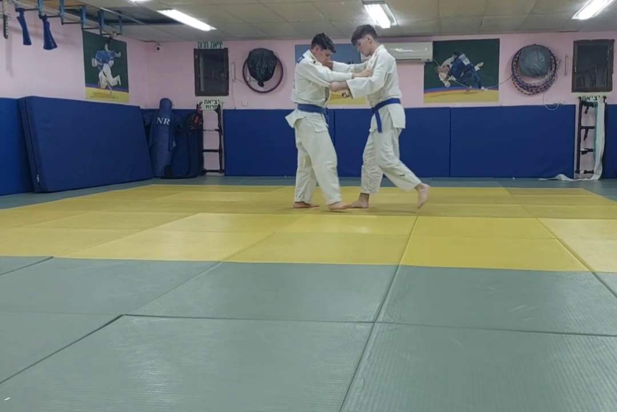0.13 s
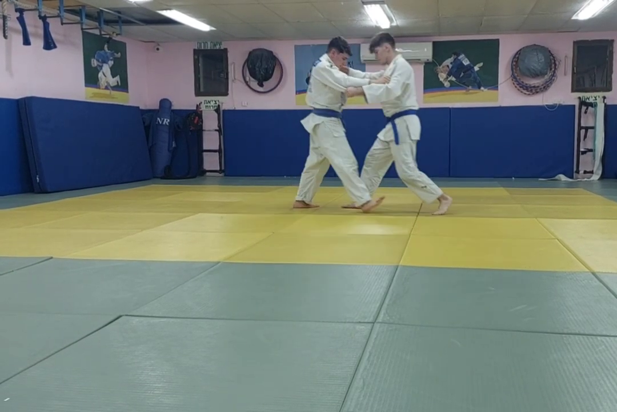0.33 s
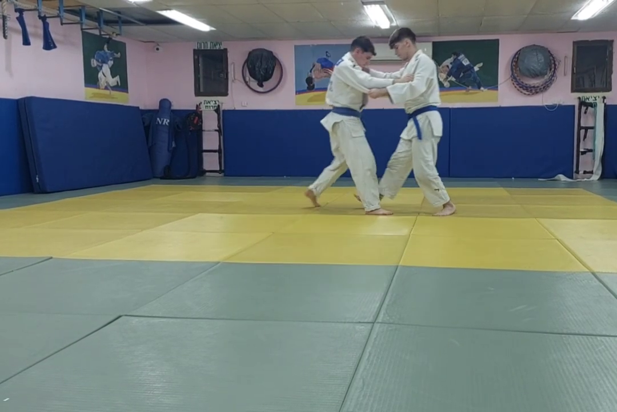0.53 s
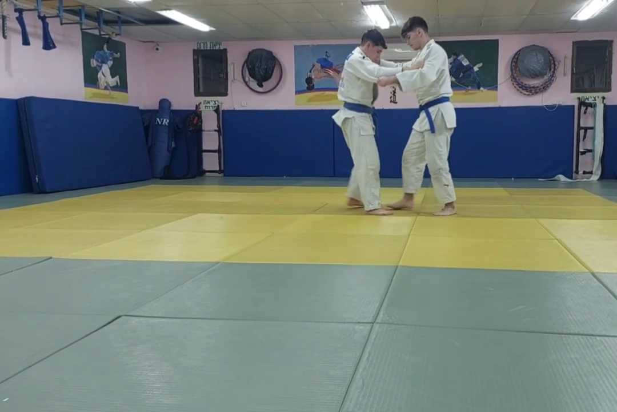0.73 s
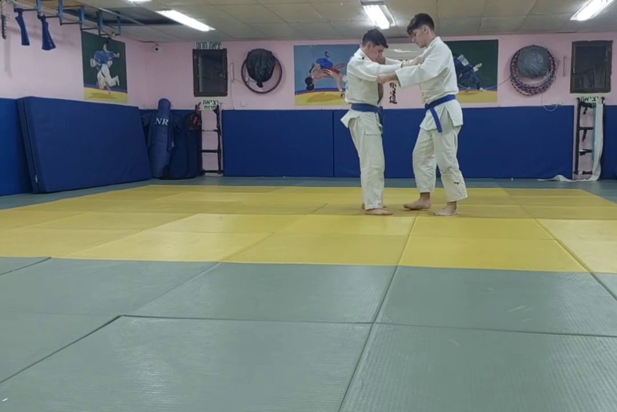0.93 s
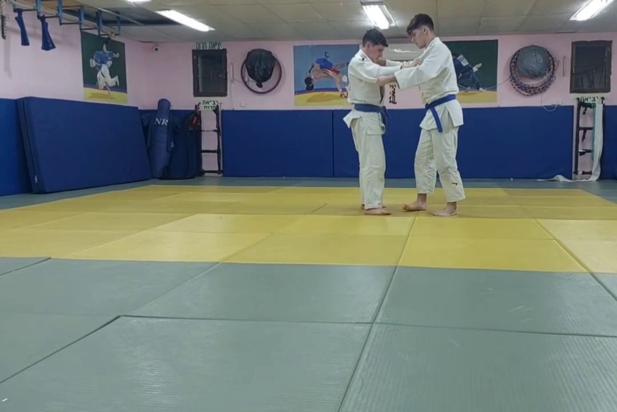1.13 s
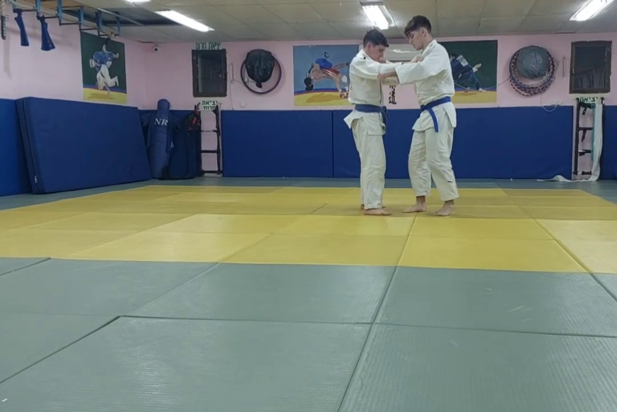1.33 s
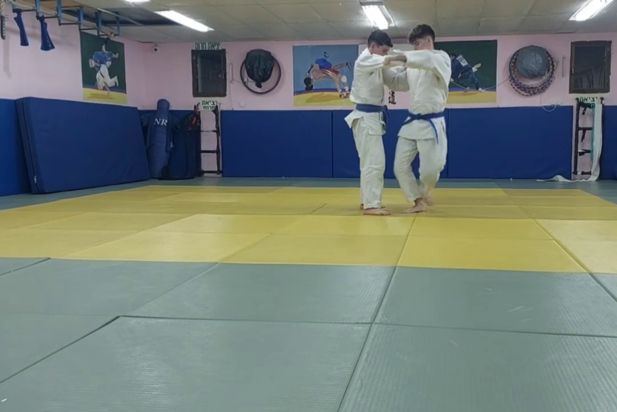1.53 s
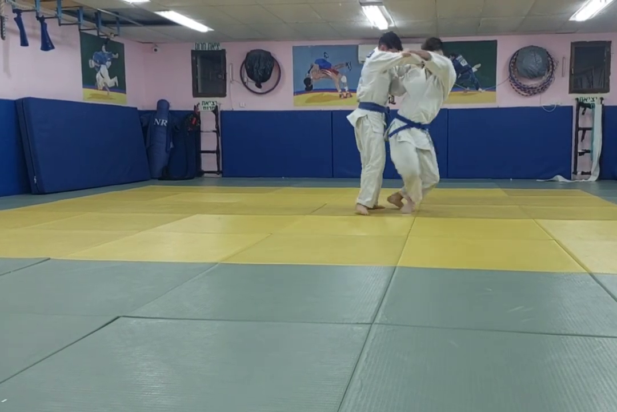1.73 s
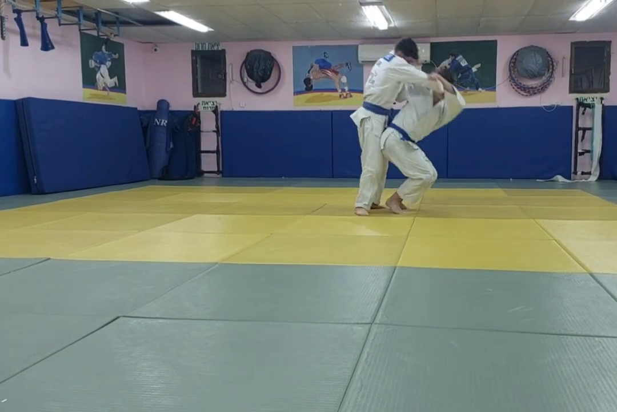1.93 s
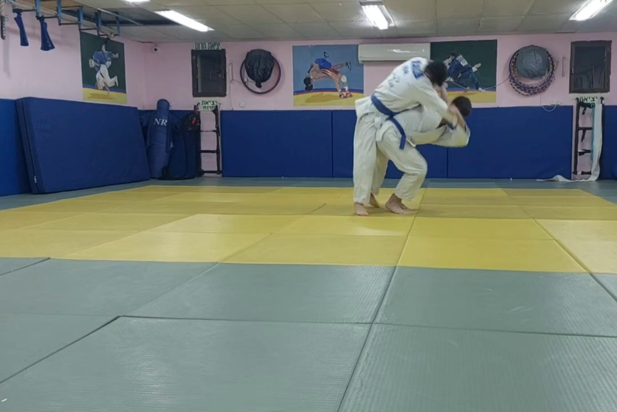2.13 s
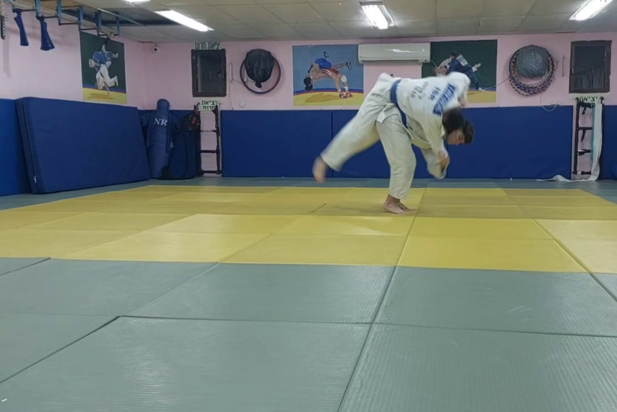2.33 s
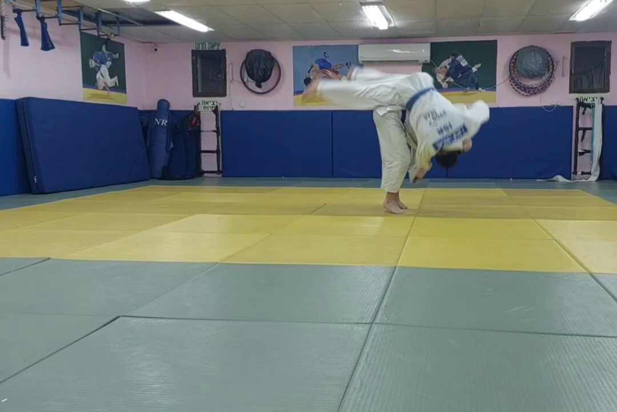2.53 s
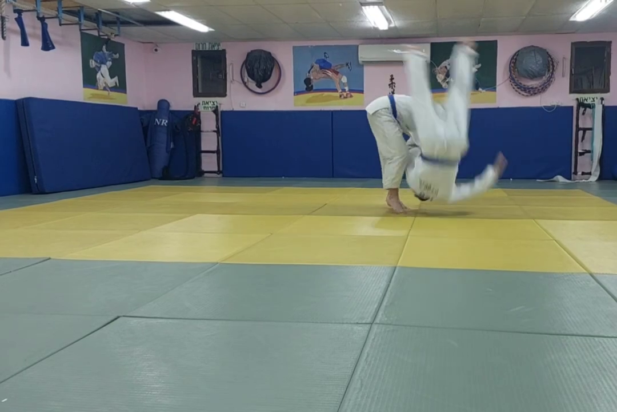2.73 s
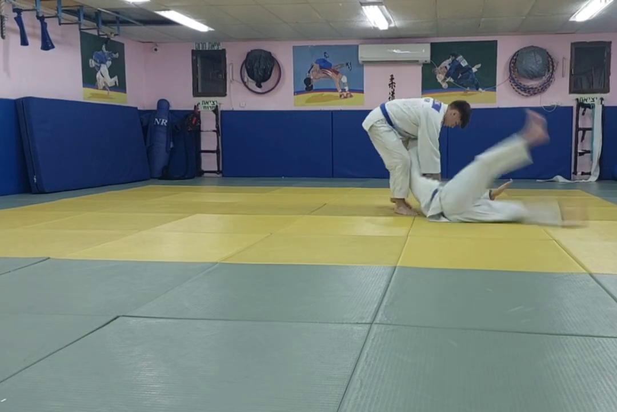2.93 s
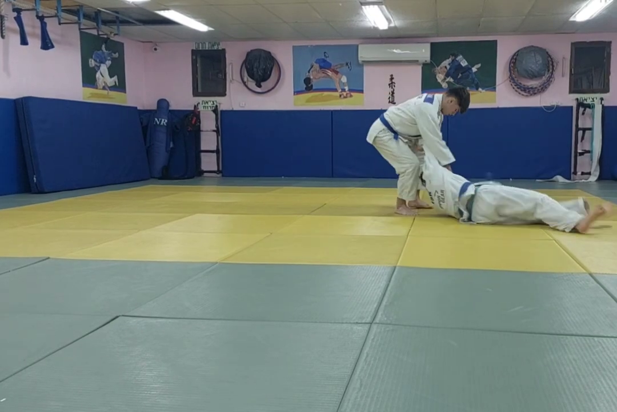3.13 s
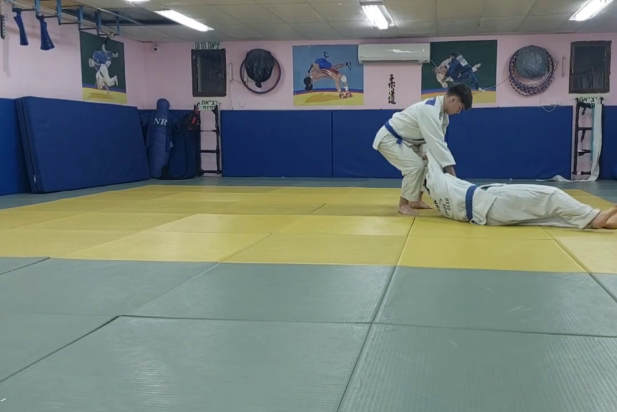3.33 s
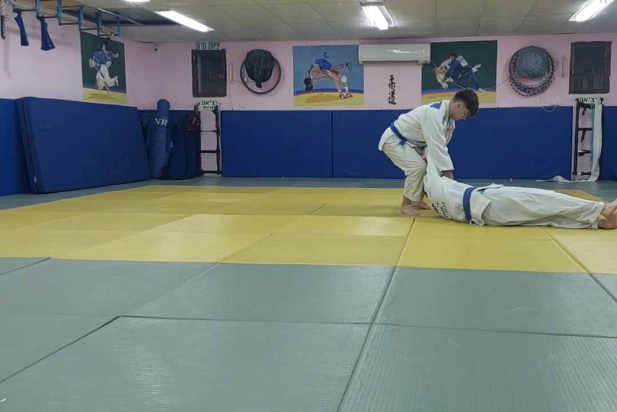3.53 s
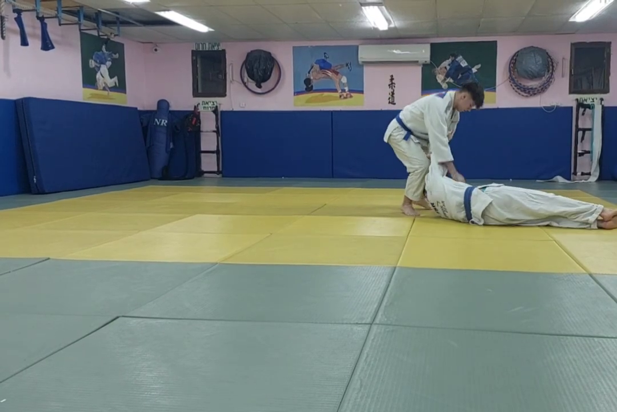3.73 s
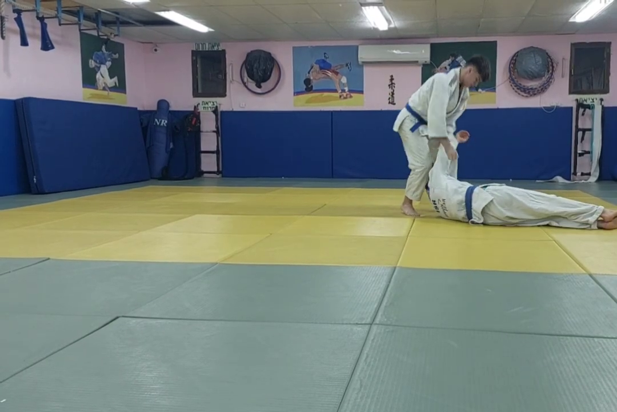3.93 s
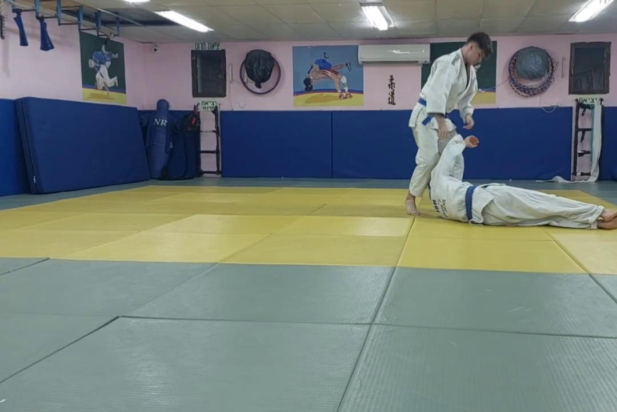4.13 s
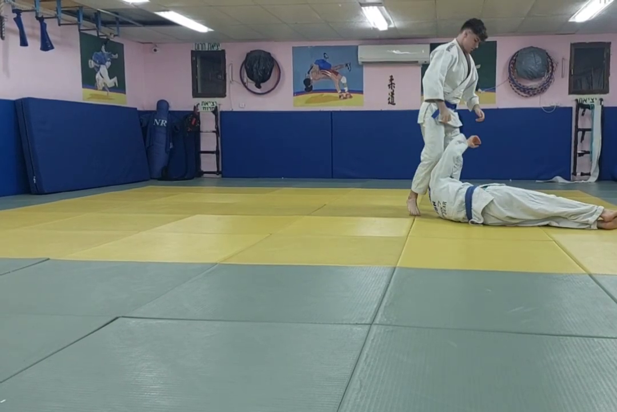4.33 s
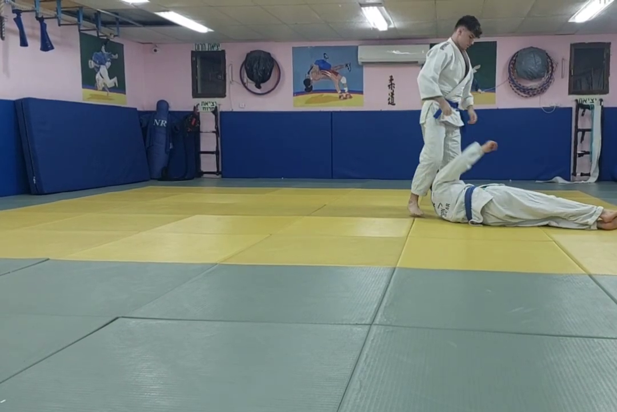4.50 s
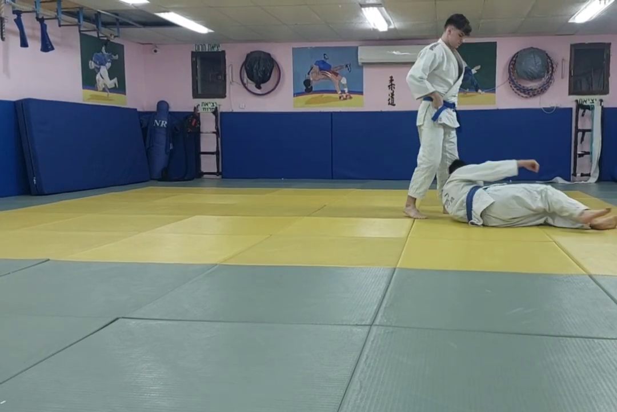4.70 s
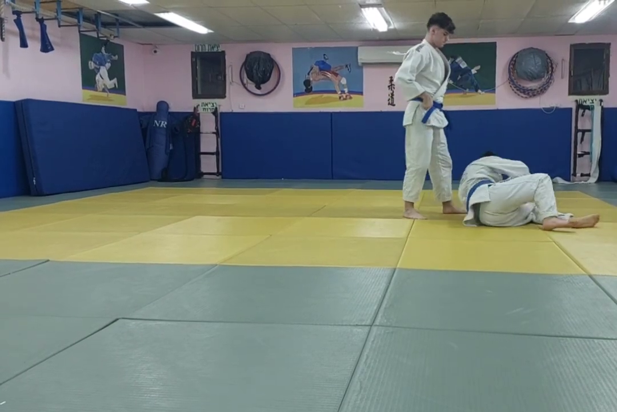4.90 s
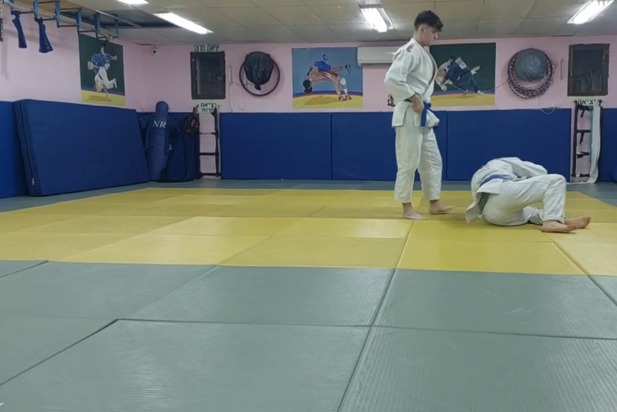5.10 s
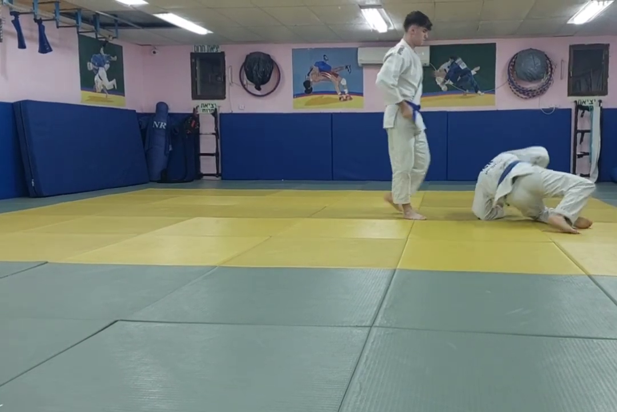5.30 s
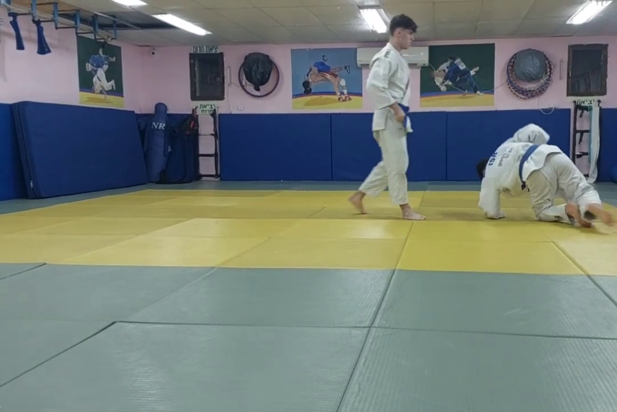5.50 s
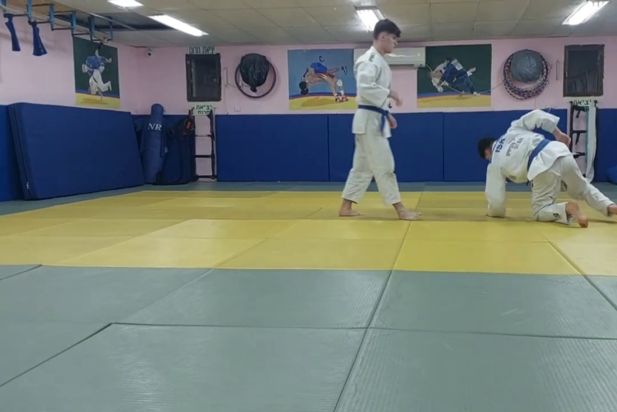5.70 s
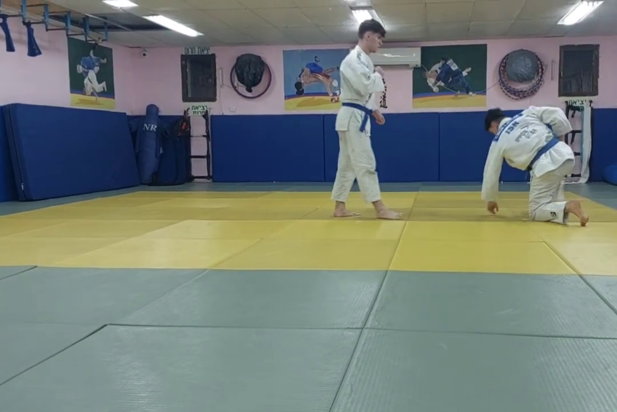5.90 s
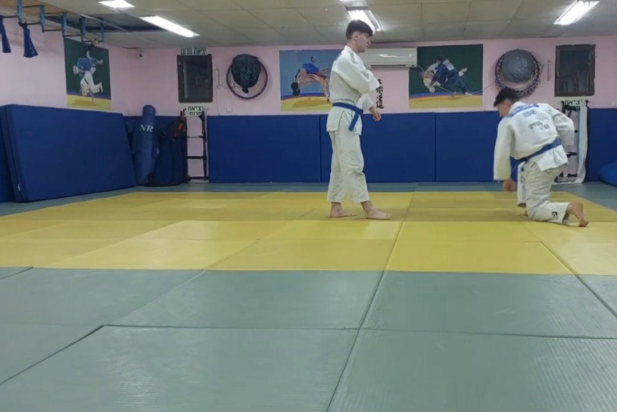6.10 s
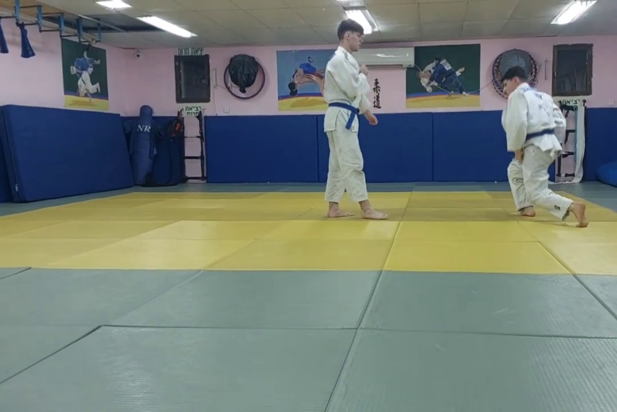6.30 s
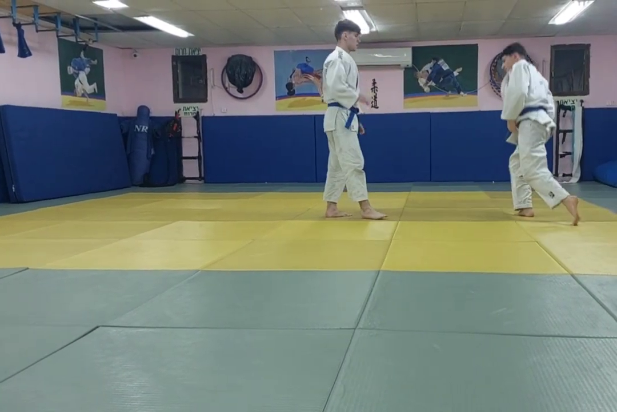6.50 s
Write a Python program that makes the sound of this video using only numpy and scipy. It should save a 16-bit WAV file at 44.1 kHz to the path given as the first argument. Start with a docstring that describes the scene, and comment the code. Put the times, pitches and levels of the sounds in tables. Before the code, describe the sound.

Soft bare steps and thick jacket fabric rub over a steady low air rush. A body then hits the mats in a quick ragged cluster, arm slap first, then a heavier second blow, ringing the floor with a low boom that soon fades. Afterwards come light rustles, brief squeaks and dull steps as the fighters separate and rise. Distant stereo pickup in a moderately live room, its level ducking after the loud fall.

```python
"""Fall on padded mats

A thrown body lands on mats in a low training hall: arm, back, hips, legs and heels, one after the other.
Force bumps ring floor resonances; slaps are noise bursts with reverberant echoes. Cloth and feet rub as
patchy noise; short squeaks, ticks and a noisy swish are wavering tones; ventilation is low noise.
Loud sound turns the gain down."""
import sys
import numpy as np
from scipy import signal
from scipy.fft import rfft, irfft, next_fast_len
from scipy.io import wavfile
from scipy.ndimage import uniform_filter1d, minimum_filter1d, map_coordinates

SR = 44100
rng = np.random.default_rng(int(sys.argv[2]) if len(sys.argv) > 2 else 0)


def file_out(sig):
    """Save sig as 16-bit WAV at sys.argv[1]."""
    # one column per channel
    cols = np.atleast_2d(sig).T
    # limit, then scale
    lim = np.clip(cols, -1, 1)
    pcm = np.round(lim * 32767).astype(np.int16)
    wavfile.write(sys.argv[1], SR, pcm)


N = 288855
T = np.arange(N) / SR

# Contacts of the fall. Each row: start in seconds, relative slap level in dB, slap length in seconds,
# slap treble edge in Hz, echo over slap in dB, relative push level in dB, push length in seconds.
CONTACTS = [(2.8179, -31, 0.0072, 3500, 2, -44, 0.0028), (2.8228, -20, 0.019, 3960, 2.5, -17.5, 0.0011),
            (2.8372, -10, 0.0032, 13800, 4, -5.5, 0.0027), (2.84, -9.5, 0.0063, 14000, 3, -1, 0.0027),
            (2.847, -15.5, 0.0031, 7100, 5.5, -5, 0.0027), (2.862, -32, 0.0052, 6000, 0.5, -16.5, 0.0033),
            (2.878, -17, 0.0045, 6000, 4, -8.5, 0.0049), (2.9294, -10, 0.0021, 3500, -6, -25, 0.0028),
            (2.977, -5.5, 0.0083, 4400, 0, -43, .003), (2.9805, -12.5, 0.0018, 14800, 4, 0, 0.0035),
            (2.991, -5, 0.0027, 3500, -10.5, -4, 0.0024), (3.005, -29.5, .006, 5000, -7.5, -13.5, 0.0043),
            (3.02, -18.5, 0.021, 5000, -5.5, -16.5, 0.0065), (3.07, -30, .008, 5000, -9, -28.5, 0.0095),
            (3.2, -37, 0.023, 9350, 2.5, -16, 0.0047), (3.219, -42, 0.025, 6050, 7.5, -19.5, 0.0054)]


def amp(db):
    """Gain of a level in dB."""
    return 10 ** (np.asarray(db) / 20)


def unit(x):
    """Scaled to rms 1."""
    return x / np.sqrt(np.mean(x ** 2) + 1e-20)


def along(points, hz):
    """(Hz, value) points interpolated on a log frequency axis."""
    point_hz, value = np.transpose(points)
    return np.interp(np.log(hz + 1), np.log(point_hz + 1), value)


def wobble(rate_hz, size=N):
    """A smooth random curve through rate_hz normal knots a second."""
    knots = rng.standard_normal(int(size * rate_hz / SR) + 4)
    return map_coordinates(knots, [T[:size] * rate_hz])


def filtered(x, response):
    """x times a response of frequency, zero-padded."""
    m = next_fast_len(x.shape[-1] + 8192)
    spectrum = rfft(x, m) * response(np.fft.rfftfreq(m, 1 / SR))
    return irfft(spectrum, m)[..., :x.shape[-1]]


def diffuse(pair, colour):
    """Two unrelated signals coloured and mixed so that bass is shared and treble differs."""
    # Left-right likeness. Each row: frequency in Hz, correlation from -1 to 1.
    likeness = [(60, 0.9), (180, 1), (550, 0.72), (1650, 0.052), (4970, -0.12), (15000, 0.23)]

    def mid_side(hz):
        turn = np.arccos(np.clip(along(likeness, hz), -1, 1)) / 2
        return amp(along(colour, hz)) * [np.cos(turn), np.sin(turn)]

    mid, side = filtered(pair, mid_side)
    return np.array([mid + side, mid - side])


def rush(colour, patchy_db):
    """Stereo noise of rms 1 with time-frequency patches of random gain."""
    z = signal.stft(rng.standard_normal((2, N)), nperseg=512)[2]
    field = uniform_filter1d(rng.standard_normal(z.shape[1:]), size=6, axis=0)
    field = uniform_filter1d(field, size=12, axis=1)
    patchy = signal.istft(z * amp(patchy_db * unit(field)), nperseg=512)[1][:, :N]
    return unit(diffuse(patchy, colour))


def tail(colour, size=SR * 3 // 4):
    """A fresh reverberant tail, mean channel energy 1: each frequency dies at its own speed."""
    # Hall decay. Each row: frequency in Hz, t60 in seconds.
    hall_t60 = [(100, 1), (300, 0.22), (700, 0.3), (2000, 0.4), (6000, 0.56), (14000, 0.42)]
    hz, t, z = signal.stft(diffuse(rng.standard_normal((2, size)), colour), SR, nperseg=256)
    dying = z * amp(-60 * t / along(hall_t60, hz)[:, None])
    decay = signal.istft(dying, SR, nperseg=256)[1][:, :size]
    return decay / np.linalg.norm(decay) * np.sqrt(2)


def hall(x):
    """Mono x convolved with a stereo reverberant tail of nearly flat colour."""
    return signal.fftconvolve(x[None], tail([(20, 0.01), (20000, 0.0019)]), axes=1)[:, :N]


def pushes(rows):
    """The force on the floor: one smooth bump for each contact, its area set by the level."""
    force = np.zeros(N)
    for start_s, db, length_s in rows:
        bump = np.sin(np.pi * np.clip((T - start_s) / length_s, 0, 1)) ** 2
        force += amp(db) / (length_s * SR) * bump
    return force


def ringing(force, sustain):
    """Damped sine resonances answering a force, their decay times scaled by sustain."""
    # Floor and hall resonances. Each row: frequency in Hz, relative level in dB,
    # t60 in seconds at sustain 1, signed size of the first swing.
    resonances = [(30.6, -24, 4.3, 0.39), (36.96, -22.5, 2.5, -0.9), (41.1, -41, 1.2, 1),
                  (46.84, -24, 1.9, -0.95), (56.85, -14.5, 1.08, 1), (64.8, -2.5, 1.13, -0.82),
                  (69.1, -12.5, 0.71, 1), (76.25, -16.5, 0.82, -0.89), (93.2, -3.5, 0.29, 0.73),
                  (124.4, -9.5, 0.59, 0.7), (137.2, -9.5, 0.49, 1), (173.1, -3.5, 0.35, -0.81),
                  (216.2, -12, 0.24, 0.66), (261.6, -1.5, 0.075, 1), (304, -6, 0.056, 0.98),
                  (472, -10.5, 0.1, -1.1), (573, -0.5, 0.077, 1), (650, -16, .07, -1.3),
                  (950, -9, 0.056, 1)]
    t = T[:2 * SR]
    ring = np.zeros(len(t))
    for hz, db, t60_s, swing in resonances:
        ring += swing * amp(db - 60 * t / (t60_s * sustain)) * np.sin(2 * np.pi * hz * t)
    return signal.fftconvolve(force, ring)[:N]


def ventilation():
    """Ventilation air: a steady low noise rush that swells a little."""
    # Each row: frequency in Hz, relative level in dB per Hz.
    air_colour = [(12, -58), (20, -22.5), (53, -5), (198, -0.5), (301, -5), (607, -23), (825, -19),
                  (1120, -24.5), (1660, -21), (2260, -29), (3250, -27), (4940, -38.5), (7310, -58),
                  (12800, -52.5), (16000, -54)]
    swell_db = 0.5 * wobble(3) + 1.17 * wobble(10)
    return amp(-45 + swell_db) * rush(air_colour, patchy_db=0.7)


def rubbing():
    """Friction noise: heavy cotton rustles; soles dragging over the vinyl add a fine fizz on top."""
    # Slides of cloth and feet. Each row: start in seconds, hold after the rise in seconds,
    # rustle level in dB, fizz relative to the rustle in dB.
    slides = [(.4, 0.058, -58.5, -22), (0.495, 0.29, -53.5, -16.5), (1.08, 0.042, -75, -3),
              (1.53, 0.06, -58, -26), (1.66, .05, -57, -15), (1.862, .04, -61, -15),
              (2.158, .03, -57.5, -16.5), (2.216, 0.018, -55, -16), (2.33, .06, -59, -21.5),
              (2.46, 0.046, -57, -22.5), (2.775, 0.51, -53, -22), (3.701, 0.12, -53, -18),
              (3.96, .15, -53, -27), (4.394, 0.29, -57, -21.5), (4.804, 0.23, -57.5, -16),
              (5.104, 0.18, -56.5, -20.5), (5.352, 0.086, -54.5, -19), (5.75, 0.027, -56.5, -17.5),
              (5.837, 0.11, -53.5, -17.5), (6.073, 0.084, -58, -24), (6.4, 0.22, -59.5, -29)]
    # Colours. Each row: frequency in Hz, relative level in dB per Hz.
    rustle_colour = [(200, -45), (400, -2.5), (800, 0), (1150, -4), (1550, -1), (2250, -8), (3000, 1.5),
                     (3700, -8), (4900, -9.5), (7000, -27.5), (9000, -65)]
    fizz_colour = [(5000, -58), (7500, -9), (10500, 0), (13000, 0), (16000, 0)]
    rest_db, rest_fizz_db = -63, -24  # the cloth never lies quite still; fizz is relative
    fade_s = 0.88  # time to fall 60 dB

    rustle_power = amp(2 * rest_db)
    fizz_power = amp(2 * (rest_db + rest_fizz_db))
    for start_s, hold_s, db, fizz_db in slides:
        rise_s = 0.042 + 0.24 * hold_s  # longer slides start more slowly
        rise = np.sin(np.pi / 2 * np.clip((T - start_s) / rise_s, 0, 1)) ** 2
        fading_s = np.maximum(T - start_s - rise_s - hold_s, 0)
        power = (rise * amp(db - 60 * fading_s / fade_s)) ** 2
        rustle_power = rustle_power + power
        fizz_power = fizz_power + amp(2 * fizz_db) * power
    fizz = np.sqrt(fizz_power) * rush(fizz_colour, patchy_db=1.0)
    rustle = np.sqrt(rustle_power) * rush(rustle_colour, patchy_db=2)
    uneven_db = 1 * wobble(25)
    return amp(uneven_db) * (rustle + fizz)


def mat_chirps():
    """Short squeaks, ticks and a noisy swish of feet or cloth on the mat: wavering tones with an
    octave, plus reverberation."""
    # Each row: start in seconds, length in seconds, start pitch in Hz, end pitch in Hz,
    # wavering as a share of pitch, level before flutter in dB, octave relative to it in dB.
    chirps = [(0.447, 0.034, 4800, 4600, .1, -66, -25), (1.678, .08, 4430, 3910, .05, -54, -28),
              (2.502, 0.056, 4700, 4600, 0.08, -58, -16), (3.725, 0.029, 3050, 3000, 0.1, -48, -26),
              (4.102, 0.081, 5200, 5170, 0.055, -59, -28), (5.757, .05, 4820, 4600, .13, -56.5, -20),
              (6.121, 0.02, 1880, 1830, 0.11, -45, -25)]
    out = np.zeros(N)
    waver = wobble(1600)
    flutter = amp(2 * wobble(150))
    for start_s, length_s, start_hz, end_hz, share, db, octave_db in chirps:
        u = np.clip((T - start_s) / length_s, 0, 1)
        pitch_hz = (start_hz + (end_hz - start_hz) * u) * (1 + share * waver)
        phase = 2 * np.pi * np.cumsum(pitch_hz) / SR
        shape = np.abs(np.sin(np.pi * u ** 0.55))  # exponent under 1: peaks early
        tone = np.sin(phase) + amp(octave_db) * np.sin(2 * phase)
        out += amp(db) * shape * flutter * tone
    return out + amp(-2) * hall(out)


def floor():
    """Every push rings the same resonances, so a later one can add to the boom or stop it."""
    # Soft footfalls. Each row: start in seconds, relative push level in dB.
    footfalls = [(0.54, -40.5), (0.874, -40.5), (0.897, -40.5), (0.945, -43), (1.75, -41.5), (2.23, -46.5),
                 (4.052, -40), (5.01, -43.5), (5.24, -46), (5.55, -46), (5.69, -49), (6.1, -44)]
    step_s = 0.0062  # push length
    fall = pushes([(start_s, db, length_s) for start_s, *_, db, length_s in CONTACTS])
    steps = pushes([(start_s, db, step_s) for start_s, db in footfalls])
    boom = amp(10.5) * ringing(fall, sustain=0.99)
    # between the strong resonances many weak ones blur into a low wash
    wash = amp(19) * hall(filtered(fall, lambda hz: hz / (hz + 80)))
    # a light step only dents the foam, which damps it quickly
    thuds = amp(16.5) * ringing(steps, sustain=0.31)
    return boom + wash + thuds


def slaps():
    """Air squeezed out between cloth and vinyl: crackling bursts, each with its own edge and echo."""
    # Each row: frequency in Hz, relative level in dB per Hz.
    slap_colour = [(180, -13), (300, -5.5), (392, -16), (574, -7.5), (624, -15.5), (856, -19), (930, -16.5),
                   (1170, -21.5), (2360, -16.5), (5160, -25), (7200, -43), (15200, -32.5), (16000, -48.5)]
    out = np.zeros((2, N + SR))
    for start_s, db, length_s, edge_hz, echo_db, _, _ in CONTACTS:
        colour = [(hz, level - 10 * np.log10(1 + (hz / edge_hz) ** 6)) for hz, level in slap_colour]
        grain_gain = amp(2 * rng.standard_normal(64)).repeat(32)
        crackle = unit(diffuse(rng.standard_normal((2, 2048)) * grain_gain, colour))
        echo = tail(colour)
        u, t = T[:crackle.shape[1]], T[:echo.shape[1]]
        rise = np.sin(np.pi / 2 * np.minimum(u / 0.00029, 1)) ** 2
        shape = rise * amp(db - 20 * np.maximum(u - length_s, 0) / 0.0029)  # falls 20 dB in 2.9 ms
        from_start = out[:, round(start_s * SR):]
        from_start[:, :len(u)] += shape * crackle
        # the walls need a few milliseconds to answer, and they answer in separate bundles
        walls = (1 - np.exp(-t / 0.0012)) * amp(1.77 * wobble(140, size=len(t)))
        from_start[:, :len(t)] += amp(echo_db) * np.linalg.norm(shape) * walls * echo
    return out[:, :N]


def scene():
    """All that sounds in the hall."""
    return ventilation() + rubbing() + mat_chirps() + floor() + slaps()


def gain_control(x, threshold_db=-30, depth_db=9, hold_s=0.84, release_s=0.28, attack_s=0.058):
    """Loud sound turns the gain down; it waits, then the cut fades away."""
    power = np.abs(uniform_filter1d(np.mean(x ** 2, axis=0), size=2048))
    level_db = 10 * np.log10(power + 1e-12)
    cut = np.clip((level_db - threshold_db) / 6, 1e-6, 1)  # full cut 6 dB over threshold
    wait, soft = int(hold_s * SR) | 1, int(attack_s * SR) | 1
    # the origins make both windows look back only
    held = -minimum_filter1d(-cut, wait, origin=wait // 2)
    fading = np.exp(np.maximum.accumulate(np.log(held) + T / release_s) - T / release_s)
    return x * amp(-depth_db * uniform_filter1d(fading, soft, origin=soft // 2))


def record(dry):
    """Two unlike microphone ports, the left a little ahead, then gain control, soft ceiling, band limit."""
    # Port imbalance. Each row: frequency in Hz, left over right in dB.
    imbalance = [(60, 1), (110, 1.5), (200, 1), (380, -0.5), (700, -0.5), (1290, 2), (2380, -6),
                 (4400, 1.5), (8120, 13), (15000, 4.5)]
    lead_s, ceiling, top_hz = 3.5 / SR, 0.95, 15800

    def ports(hz):
        gain = amp(np.outer([0.5, -0.5], along(imbalance, hz)))
        return gain * np.exp(1j * np.pi * lead_s * np.outer([1, -1], hz))

    x = gain_control(filtered(dry, ports))
    x = x / (1 + np.abs(x / ceiling) ** 12) ** (1 / 12)
    return filtered(x, lambda hz: hz < top_hz)


dry = scene()
out = record(dry)
file_out(out)
```